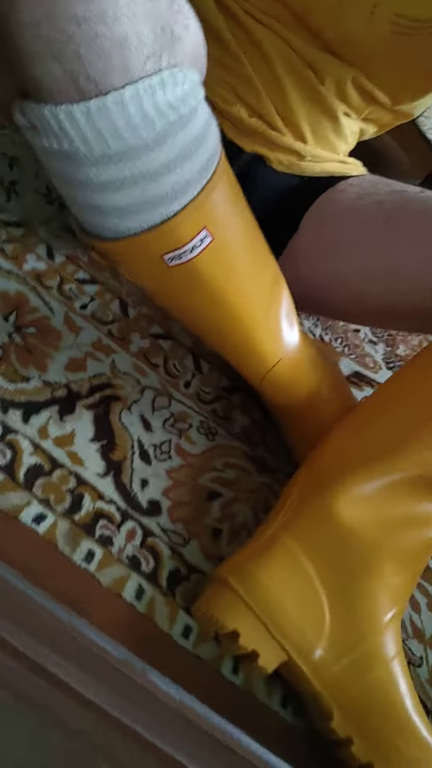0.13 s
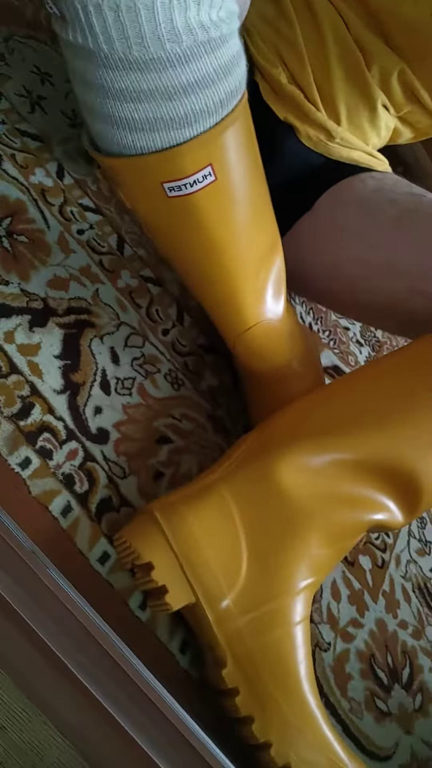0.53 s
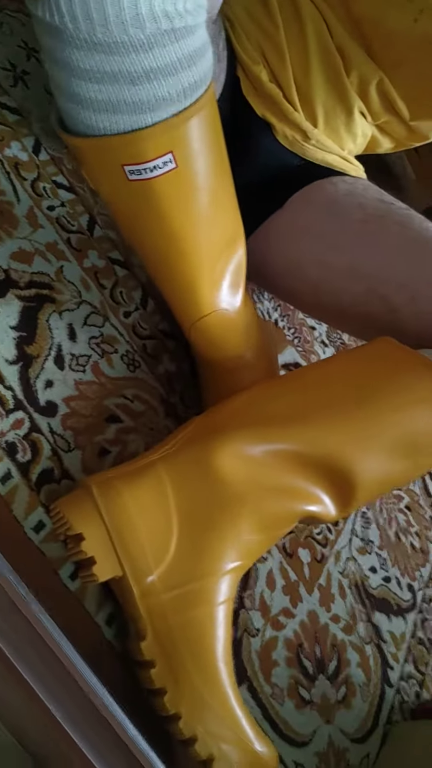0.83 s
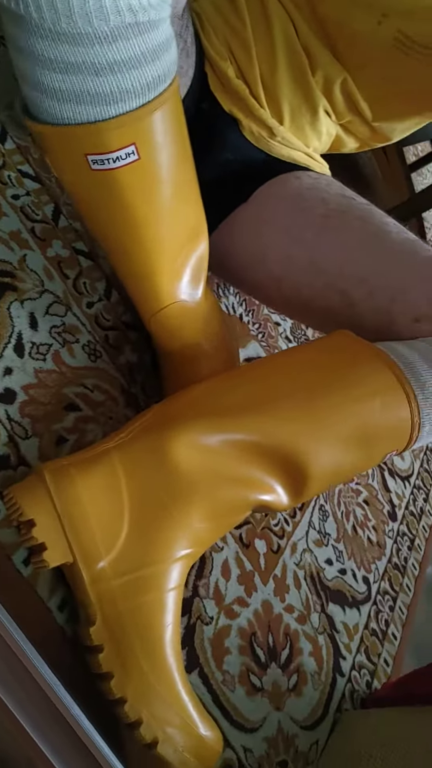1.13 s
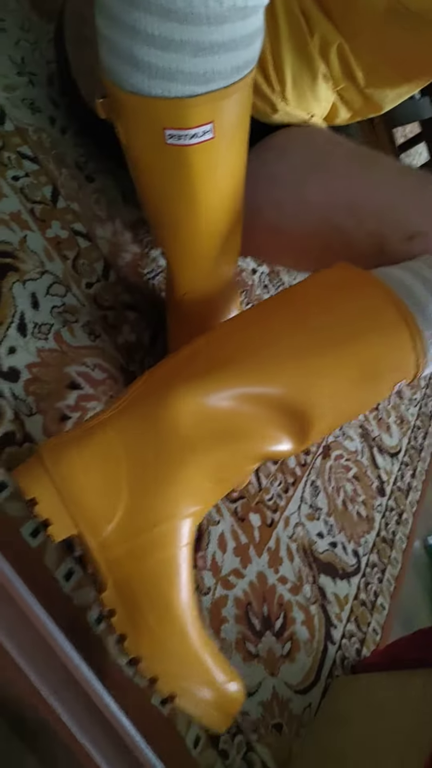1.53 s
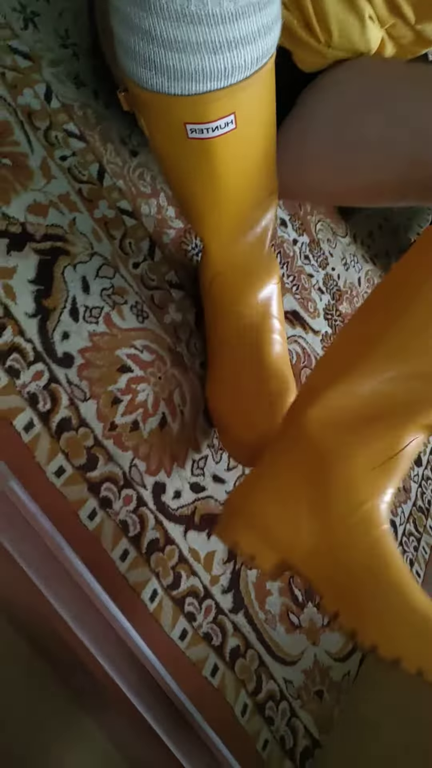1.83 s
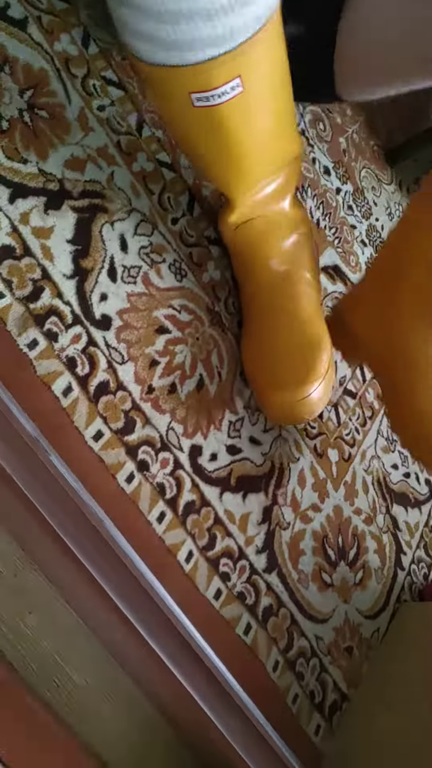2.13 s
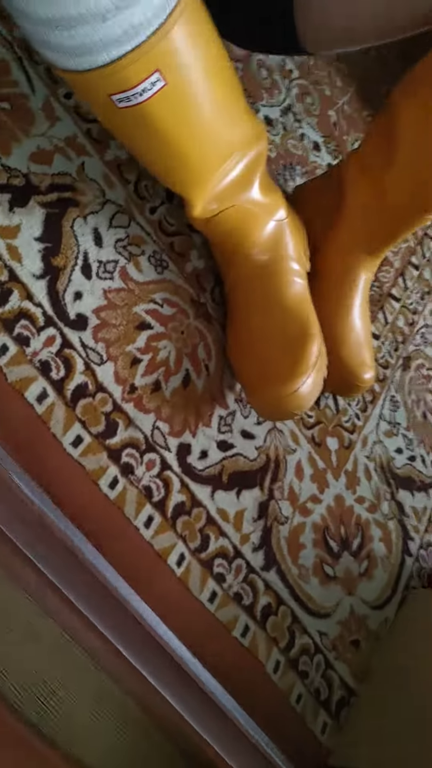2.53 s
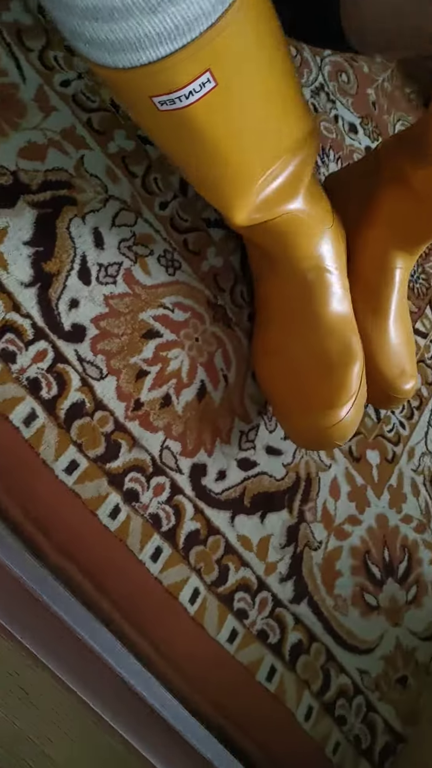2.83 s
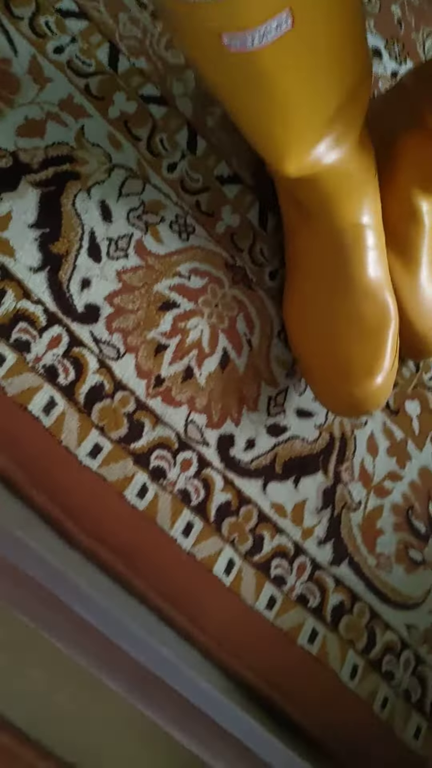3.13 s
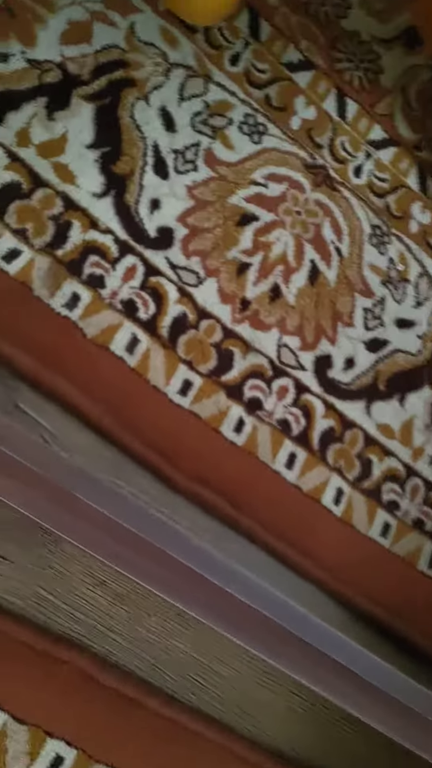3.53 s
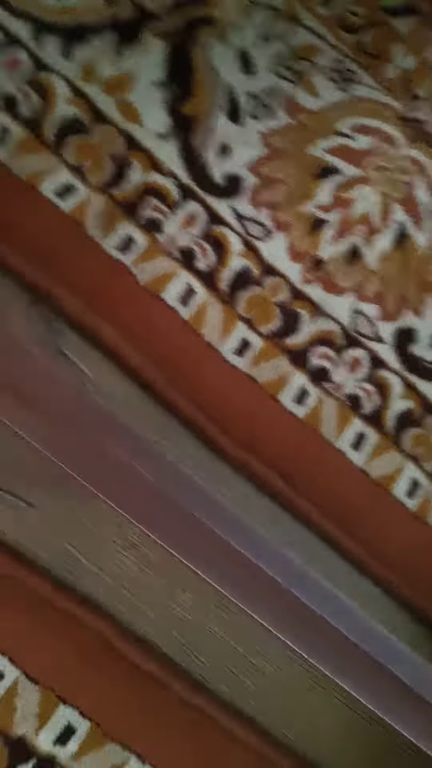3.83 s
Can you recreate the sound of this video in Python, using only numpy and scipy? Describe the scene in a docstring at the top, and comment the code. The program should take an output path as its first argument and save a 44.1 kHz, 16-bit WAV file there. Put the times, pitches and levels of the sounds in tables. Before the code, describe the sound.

Rubber boots shift on carpet in a small, quiet room, at first with faint hollow thumps, barely audible high chirps and a dull tap. From about 1.4 seconds clothing rustles and rubber scuffs in short strokes over a soft handling rumble. From 2.4 seconds the thumps grow, heels thud and the rubber squeaks faintly twice. At 3.8 seconds a knock with a sharp click hits the microphone, the loudest moment.

```python
"""Someone sitting in a small room shifts a pair of rubber boots onto a carpet, near a hand-held phone.
Over quiet room noise the boot shafts flex with hollow thumps, among faint high chirps and a dull tap.
From about 1.4 s clothing rustles, hand and body rumble, and rubber scuffs in short strokes.
From 2.4 s the thumps grow, heels thud on the floor and the rubber squeaks twice.
At 3.84 s a handling knock with a sharp click hits the phone."""
import sys
import numpy as np
from scipy import signal
from scipy.fft import rfft, irfft
from scipy.io import wavfile
from scipy.ndimage import uniform_filter1d

SR = 44100
rng = np.random.default_rng(int(sys.argv[2]) if len(sys.argv) > 2 else 0)


def generate_wav(signal):
    """Clip the signal to [-1, 1] and save it as 16-bit WAV at the path in sys.argv[1]."""
    frames = np.transpose(np.atleast_2d(signal))
    scaled = np.clip(frames, -1, 1) * 32767
    pcm = np.round(scaled).astype(np.int16)
    wavfile.write(sys.argv[1], SR, pcm)


N = 176400

# fine fabric hiss: freq_hz, gain_db
FABRIC_HISS_SPECTRUM = [(3300, -22), (4400, -3), (5800, -4), (7300, 3), (9300, -5), (11200, -2),
                        (12000, -4), (13100, -1), (13900, -9), (15700, -11)]
FABRIC_GRAIN, RUB_GRAIN = 0.21, 0.27


def undb(db):
    """Decibels to gain."""
    return 10 ** (np.asarray(db) / 20)


def unit(x):
    """Scale to rms 1."""
    return x / np.sqrt(np.mean(x ** 2))


def pan(db):
    """Channel gains for left minus right in dB."""
    return undb(np.array([[db], [-db]]) / 2)


def since(start_s):
    """Seconds since a moment, zero before it."""
    return np.maximum(np.arange(N) / SR - start_s, 0)


def curve(points):
    """Gain along (time_s, level_db) points."""
    return undb(np.interp(np.arange(N) / SR, *np.array(points).T))


def stroke(peak_s, rise_s, fall_s):
    """Envelope of one movement: Gaussian swell, exponential fall."""
    before_s = np.minimum(np.arange(N) / SR - peak_s, 0)
    return np.exp(-(before_s / rise_s) ** 2 - since(peak_s) / fall_s)


def wander(rate_hz):
    """Straight lines between random values."""
    return np.interp(np.arange(N) / SR * rate_hz, np.arange(1000), rng.standard_normal(1000))


def colour(x, spectrum):
    """Minimum-phase filter through (freq_hz, gain_db) points."""
    hz, db = np.array(spectrum, float).T
    bins_hz = np.arange(N // 2 + 1) * SR / N
    gain = undb(np.interp(np.log(bins_hz + 1), np.log(hz), db))
    cepstrum = irfft(np.log(gain), N)
    cepstrum[1:N // 2] *= 2
    return irfft(rfft(x) * np.exp(rfft(cepstrum[:N // 2 + 1], N)), N)


def edge(x, hz, kind, order=2):
    """Low- or high-pass."""
    sos = signal.butter(order, min(hz, .45 * SR), kind, fs=SR, output="sos")
    return signal.sosfilt(sos, x + 1e-18)


def stereo_noise(grain=0):
    """Noise at two microphones, alike in the bass; grain makes it a patter of tiny slips."""
    # side relative to mid: freq_hz, gain_db
    side_spectrum = [(60, -25), (200, -8), (500, -3), (2500, -2), (5000, 0), (8000, -11.5), (14000, -1)]
    noise = rng.standard_normal((2, N))
    patter = np.repeat(rng.standard_normal(N // 40 + 1), 40)[:N]
    mid, side = noise * np.exp(grain * patter)
    side = colour(side, side_spectrum)
    return unit(np.array([mid + side, mid - side]))


def friction(spectrum, grain):
    """Tiny slips of fluttering strength; a bounce off the moving boots adds shifting resonances."""
    bounce_s, bounce_gain, flutter_db = 0.0022, 0.21, 1.6
    slips = stereo_noise(grain)
    delay_s = bounce_s * np.exp(0.12 * wander(rate_hz=5))
    bounce = slips[:, np.round(np.arange(N) - SR * delay_s).astype(int)]
    rub = unit(colour(slips + bounce_gain * bounce, spectrum))
    return rub * undb(flutter_db * wander(rate_hz=40))


def room(x):
    """Low room resonances, wider as they rise in pitch, and a short diffuse echo."""
    # room resonances: pitch_hz, level_db, t60_s
    resonances = [(100.6, 2, 0.18), (133.7, 0.5, 0.22), (181, -1.5, 0.16), (239.8, -6, 0.158),
                  (276.6, -14, 0.26), (357, -11.5, 0.24), (417, -17.5, 0.44), (465, -6, 0.22)]
    modes_db, echo_db, echo_t60_s, delay_s = -46.5, -8.5, 0.16, 0.0091
    skew_rad_per_hz = 0.1 / 181
    t = since(delay_s)[:SR // 2]
    modes = 0
    for hz, db, t60_s in resonances:
        skew_rad = np.array([[1], [-1]]) * skew_rad_per_hz * hz * rng.choice([-1, 1])
        envelope = undb(db - 60 * t / t60_s) * np.minimum(t * hz, 1)
        modes = modes + envelope * np.sin(2 * np.pi * hz * t + skew_rad)
    echo = stereo_noise()[:, :len(t)] * undb(-60 * t / echo_t60_s) * (t > 0)
    response = undb(modes_db) * modes + undb(echo_db) * unit(echo) / np.sqrt(len(t))
    return signal.fftconvolve(x[None], response, axes=1)[:, :N]


def air():
    """Quiet room rumble and microphone hiss."""
    # noise floor: freq_hz, gain_db
    spectrum = [(20, -6), (50, -2), (100, -1), (200, -11), (400, -18), (700, -23), (1200, -25), (2200, -28),
                (3500, -34), (7300, -38), (8800, -53), (10300, -45), (13300, -36), (15700, -36)]
    return undb(-62) * unit(colour(stereo_noise(), spectrum))


def thumps():
    """Each hollow bump is a heavily damped swing that sets the room ringing."""
    # rubber, and hand on phone: start_s, level_db, pitch_hz, swell_cycles, room_db
    bumps = [(0.232, -45, 233, 0.48, 2), (.368, -49, 335, 0.64, 3), (0.486, -50.5, 298, 0.51, -6),
             (1.075, -45, 303, 0.5, 6), (1.135, -44.5, 325, 0.99, -2), (1.53, -42, 248, 0.31, 2.5),
             (1.653, -37.5, 355, 0.34, 0), (1.68, -50, 403, .8, 1), (1.698, -44, 255, 0.76, -23),
             (1.711, -45.5, 392, 0.37, -11), (1.721, -46, 226, 0.68, -3), (1.876, -44, 145, 0.24, -6),
             (2.407, -28.5, 150.6, 0.86, -5), (2.606, -22.5, 162, 0.6, -11.5), (2.626, -38, 295, 0.91, 5),
             (2.644, -34.5, 190, 0.36, -6.5), (2.887, -43.5, 372, 1.4, 3), (2.899, -42, 142, 1.7, -7.5),
             (3.061, -22, 383, 0.9, -9), (3.066, -27, 159, 0.59, -7), (3.092, -34.5, 382, 0.67, 3),
             (3.334, -31.5, 376, 1.4, -3), (3.365, -24.5, 150, 0.61, -6.5), (3.368, -27, 391, 1.46, -4),
             (3.405, -35.5, 146, 1.3, -28), (3.685, -19, 161, 0.7, -7.5), (3.710, -30.5, 447, 0.89, 3),
             (3.726, -33, 166, 0.39, -4), (3.844, -3.5, 179.5, 0.34, -6), (3.861, -22, 200, 0.62, -24),
             (3.874, -24.5, 119, 0.73, -37), (3.948, -38.5, 310, 0.73, 8)]
    right_lag_s = 0.00013
    direct, to_room = np.zeros(N), np.zeros(N)
    for start_s, db, hz, swell_cycles, room_db in bumps:
        t = since(start_s)
        age = np.minimum(t * hz / swell_cycles, 20)
        swing = undb(db) * (age * np.exp(1 - age)) ** 2 * -np.sin(2 * np.pi * hz * t)
        direct += swing
        to_room += undb(room_db) * swing
    t = np.arange(N) / SR
    right = np.interp(t - right_lag_s, t, direct)
    return np.array([direct, right]) + room(to_room)


def chirps():
    """Faint, thin chirps with a wavering pitch."""
    # high chirps: peak_s, level_db, pitch_hz
    tones = [(.335, -82, 7000), (.655, -83, 7200), (1.17, -81, 7000)]
    out = 0
    for peak_s, db, hz in tones:
        pitch_hz = hz * (1 + 0.0306 * wander(rate_hz=550))
        tone = np.sin(2 * np.pi * np.cumsum(pitch_hz) / SR)
        out = out + undb(db) * tone * stroke(peak_s, rise_s=0.014, fall_s=0.035)
    return out


def clicks():
    """Dull taps, each a contact and a brief crunch, then the bright double click of the phone's case."""
    # sharp contacts: start_s, level_db, top_hz, decay_s, pan_db
    contacts = [(1.1022, -40, 1720, 0.0026, -3.5), (1.1023, -54, 6100, 0.0012, -0.5),
                (2.649, -36.5, 790, 0.0013, -3), (2.6485, -46.5, 5600, 0.0021, -0.5),
                (3.0596, -23.5, 1900, 0.0031, -2), (3.191, -40.5, 3830, 0.0037, -2.5),
                (3.7115, -33.5, 1220, 0.006, 2), (3.7847, -24, 1840, 0.0023, 3),
                (3.789, -29, 1270, 0.0019, 5), (3.8447, -14, 1490, 0.0023, 4.5),
                (3.950, -33.5, 1070, 0.0012, -9)]
    # case response to every tap: freq_hz, gain_db
    case_spectrum = [(480, 4), (600, -6.5), (690, 3.5), (1230, 1), (1750, -6), (1910, 0.5)]
    # case click: freq_hz, gain_db
    snap_spectrum = [(1000, 7.5), (3000, -7), (5000, 5), (7500, -8), (9800, -8), (13200, 0.5), (14200, -16),
                     (15300, -7)]
    crunch_gain, low_hz, max_lag_s = 0.14, 367, 0.00073
    snap_s, snap_decay_s, repeat_s, repeat_db = 3.8452, 0.00067, 0.0034, -14
    taps = np.zeros((2, N))
    for start_s, db, top_hz, decay_s, pan_db in contacts:
        t = since(start_s)
        impulse = np.diff(np.sign(t), prepend=0)
        crunch = crunch_gain * rng.standard_normal((2, N)) * np.exp(-t / decay_s) * (t > 0)
        tap = edge(edge(impulse + crunch, top_hz, "low", order=5), low_hz, "high")
        tap = unit(tap) * np.sqrt(decay_s / 2 * SR / N)
        far_mic = int(pan_db > 0)
        lag_samples = int(max_lag_s * SR * min(abs(pan_db) / 4, 1))
        tap[far_mic] = np.roll(tap[far_mic], lag_samples)
        taps += undb(db) / 2 * pan(pan_db) * tap
    taps = colour(taps, case_spectrum)
    crack = unit(colour(rng.standard_normal(N), snap_spectrum)) * undb(-16.5) / 2 * pan(5)
    first, second = ((t > 0) * np.exp(-t / snap_decay_s)
                     for t in (since(snap_s), since(snap_s + repeat_s)))
    snap = crack * (first + undb(repeat_db) * second)
    return taps + snap + undb(-6.5) * room(taps.mean(axis=0))


def rumble():
    """Hand and body rumble softly as the movement grows."""
    # body movement: time_s, level_db
    levels = [(1.2, -80), (1.7, -59), (2.3, -69), (2.75, -58.5), (3.0, -62), (3.3, -57.5), (3.5, -60),
              (3.85, -44), (4.0, -48.5)]
    # rumble: freq_hz, gain_db
    spectrum = [(30, -15.5), (65, 8), (140, -2.5), (260, -11.5), (480, -14.5), (800, -14.5), (3000, -56)]
    return friction(spectrum, RUB_GRAIN) * curve(levels)


def clothing():
    """Fabric slides with the legs; a finer hiss joins close to the phone."""
    # sliding fabric: time_s, level_db
    slide_levels = [(0.9, -105), (1.42, -76.5), (1.61, -62.5), (1.72, -65), (1.82, -80), (1.93, -70.5),
                    (2.03, -57), (2.25, -62), (2.38, -63.5), (2.44, -53.5), (2.55, -61), (2.74, -62.5),
                    (2.86, -65.5), (3.05, -70), (3.13, -55.5), (3.29, -65.5), (3.34, -58.5), (3.39, -58),
                    (3.57, -60), (3.65, -59.5), (3.75, -54), (3.82, -58), (3.9, -53.5), (4.0, -52)]
    # sliding fabric: freq_hz, gain_db
    slide_spectrum = [(200, 22), (700, 7.5), (2300, 9.5), (3200, 4.5), (4400, 8), (5800, 3), (7400, 8),
                      (9000, -9.5), (10200, -1), (11500, -25.5), (15500, -5.5)]
    # close hiss: time_s, level_db
    hiss_levels = [(1.3, -115), (2.0, -76.5), (2.9, -73), (3.34, -73.5), (3.42, -62.5), (3.58, -59),
                   (3.65, -67.5), (3.75, -62), (3.86, -65), (4.0, -63)]
    slide = friction(slide_spectrum, FABRIC_GRAIN)
    hiss = unit(friction(FABRIC_HISS_SPECTRUM, FABRIC_GRAIN).mean(axis=0))
    return slide * curve(slide_levels) + hiss * curve(hiss_levels)


def scuffs():
    """Boots dragged in short strokes, duller where the sole presses into the pile."""
    # rubber on carpet and rubber: peak_s, level_db, rise_s, fall_s, low_hz, top_hz, pan_db
    drags = [(1.45, -71.5, 0.074, 0.21, 1220, 2620, 2), (1.612, -60.5, 0.032, 0.09, 1830, 2820, 0.5),
             (2.08, -61, 0.1, 0.12, 990, 2900, -1.5), (2.17, -60, 0.049, 0.19, 1110, 2800, 0),
             (2.26, -53.5, 0.027, 0.019, 1000, 1980, -0.5), (2.446, -54.5, 0.034, 0.062, 402, 2640, -3.5),
             (2.96, -57, 0.13, 0.036, 830, 2100, 0), (3.085, -45.5, 0.025, 0.028, 200, 1060, 1.5),
             (3.23, -68, 0.13, 0.12, 300, 1100, -8), (3.332, -41.5, 0.015, 0.015, 576, 1430, -4.5),
             (3.41, -54.5, 0.087, 0.15, 200, 456, 1), (3.569, -48.5, 0.014, 0.03, 504, 1570, -2),
             (3.73, -52, 0.04, 0.029, 200, 700, 14), (3.805, -48, 0.027, 0.061, 400, 1530, -2),
             (3.99, -59, 0.074, .05, 600, 2173, 8)]
    # rubbing rubber: freq_hz, gain_db
    spectrum = [(150, -2), (400, 3), (800, -2), (1000, -5.5), (1280, -1), (1480, -8.5), (1700, -3),
                (2150, -7), (3000, -13), (5000, -16), (10000, -6)]
    rub = friction(spectrum, RUB_GRAIN)
    out = 0
    for peak_s, db, rise_s, fall_s, low_hz, top_hz, pan_db in drags:
        band = unit(edge(edge(rub, top_hz, "low"), low_hz, "high"))
        out = out + undb(db) * pan(pan_db) * band * stroke(peak_s, rise_s, fall_s)
    return out


def swishes():
    """Smooth fabric brushes past in single strokes, each a narrow band of hiss."""
    # fabric strokes: peak_s, level_db, rise_s, fall_s, centre_hz
    brushes = [(1.65, -72, 0.098, 0.17, 7400), (2.03, -65, 0.11, .06, 4570), (2.12, -72, 0.061, 0.21, 7560),
               (3.165, -65, 0.093, 0.087, 7150), (3.328, -59, 0.0093, 0.0094, 4500),
               (3.765, -58.5, 0.063, 0.036, 6800), (3.97, -61.5, 0.038, 0.071, 7100)]
    hiss = friction(FABRIC_HISS_SPECTRUM, FABRIC_GRAIN)
    out = 0
    for peak_s, db, rise_s, fall_s, centre_hz in brushes:
        band = unit(signal.lfilter(*signal.iirpeak(centre_hz, Q=4, fs=SR), hiss))
        out = out + undb(db) * band * stroke(peak_s, rise_s, fall_s)
    return out


def thuds():
    """The floor booms softly under a heel."""
    # heels loading the floor: start_s, level_db, pitch_hz, rise_s, t60_s
    heels = [(2.439, -33, 53.7, 0.02, 0.55), (3.064, -28, 60.4, 0.0052, 0.34),
             (3.316, -42, 62.5, 0.0082, 0.5), (3.558, -29.5, 62.4, 0.012, 0.15),
             (3.849, -17, 74.4, 0.0045, 0.095)]
    out = 0
    for start_s, db, hz, rise_s, t60_s in heels:
        t = since(start_s)
        attack = np.sin(np.pi / 2 * np.minimum(t / rise_s, 1))
        decay = undb(db - 60 * since(start_s + rise_s) / t60_s)
        out = out - attack * decay * np.sin(2 * np.pi * hz * t)
    return out


def squeaks():
    """Rubber sticks and slips unevenly, ringing the boot wall."""
    # stick-slip bursts: peak_s, level_db, slip_rate_hz, rise_s, fall_s, pan_db
    bursts = [(2.839, -51, 600, 0.0039, 0.015, -2), (3.332, -50.5, 380, 0.01, 0.0063, -22.5)]
    wall_hz, bandwidth_hz, top_hz, jitter = 1044, 620, 900, 0.07
    out = 0
    for peak_s, db, slip_rate_hz, rise_s, fall_s, pan_db in bursts:
        waver = unit(uniform_filter1d(rng.standard_normal(N), SR // 500))
        rate_hz = slip_rate_hz * (1 + jitter * waver)
        slips = np.diff(np.floor(np.cumsum(rate_hz) / SR), prepend=0)
        wall = signal.lfilter(*signal.iirpeak(wall_hz, wall_hz / bandwidth_hz, fs=SR), slips)
        squeak = unit(edge(wall, top_hz, "low"))
        out = out + undb(db) * pan(pan_db) * squeak * stroke(peak_s, rise_s, fall_s)
    return out


def scene():
    """All sources at the phone, in stereo."""
    impacts = thumps() + thuds() + clicks()
    rubbing = scuffs() + squeaks() + clothing() + swishes()
    return impacts + rubbing + chirps() + rumble() + air()


def record(dry):
    """The phone cuts the deepest bass and the top."""
    low_hz, top_hz = 26.6, 15750
    top_cut = signal.ellip(8, .2, 70, top_hz, fs=SR, output="sos")
    return signal.sosfilt(top_cut, edge(dry, low_hz, "high", order=4))


dry = scene()
out = record(dry)
generate_wav(out)
```